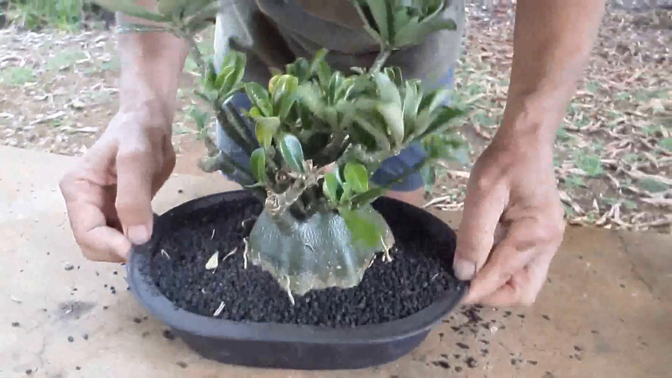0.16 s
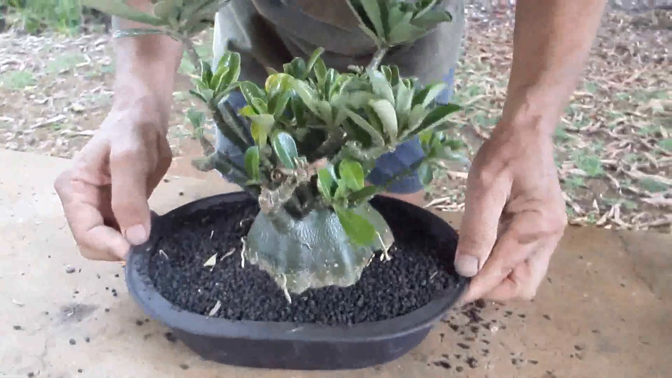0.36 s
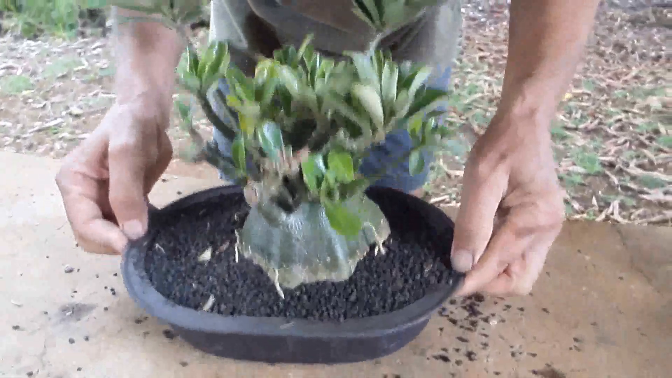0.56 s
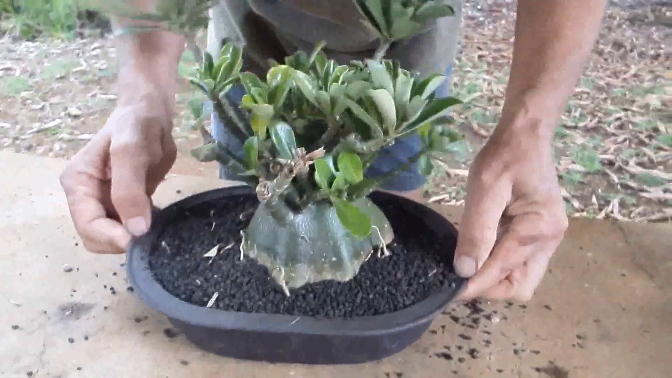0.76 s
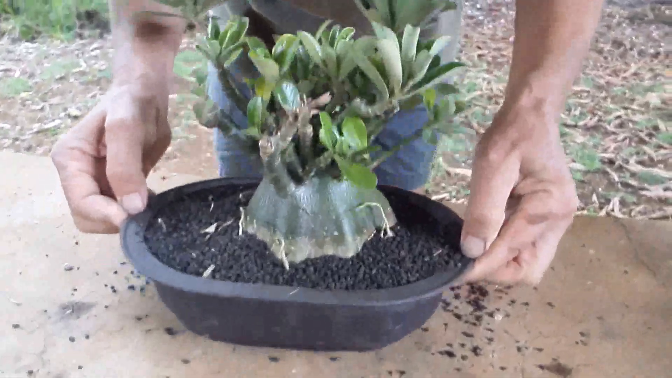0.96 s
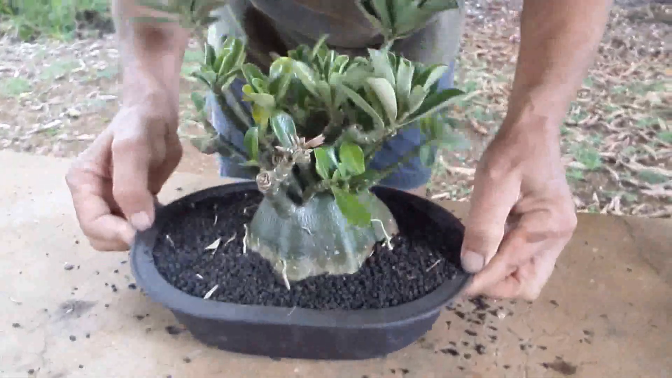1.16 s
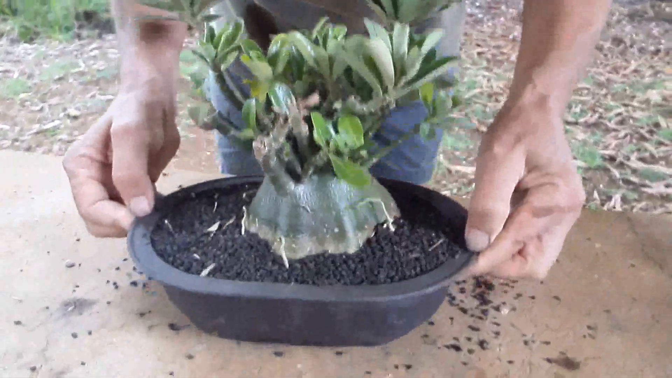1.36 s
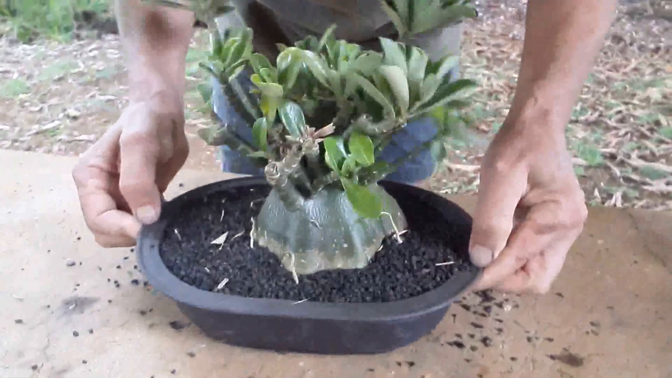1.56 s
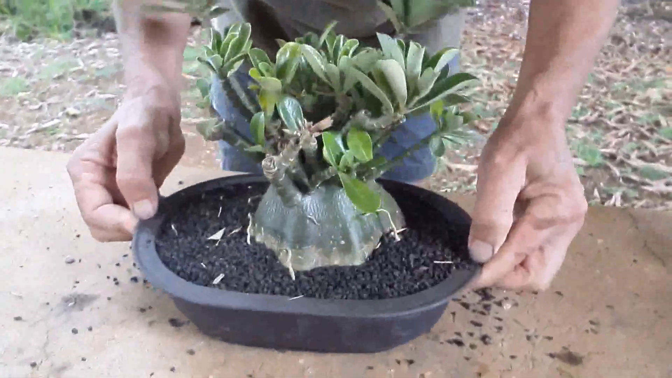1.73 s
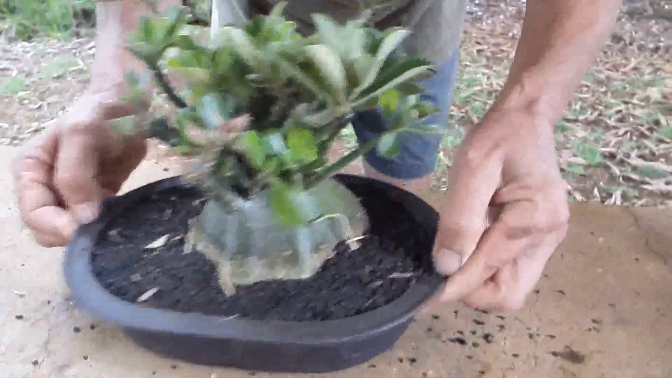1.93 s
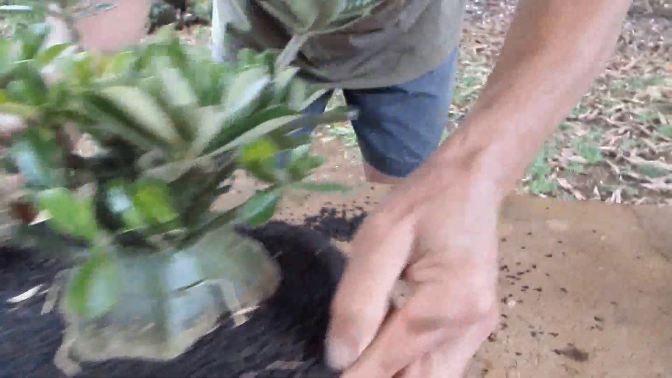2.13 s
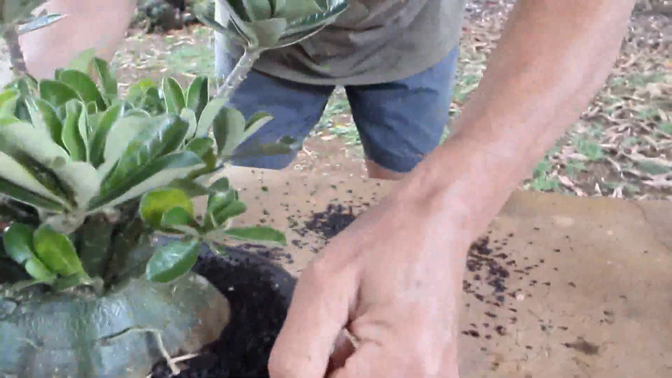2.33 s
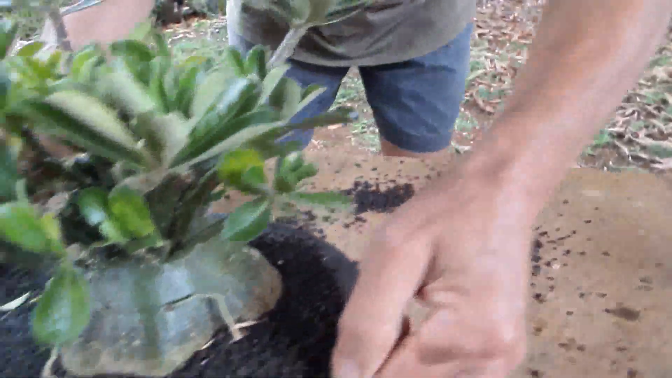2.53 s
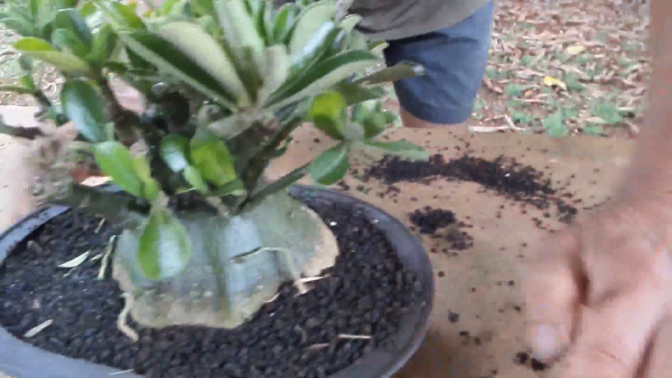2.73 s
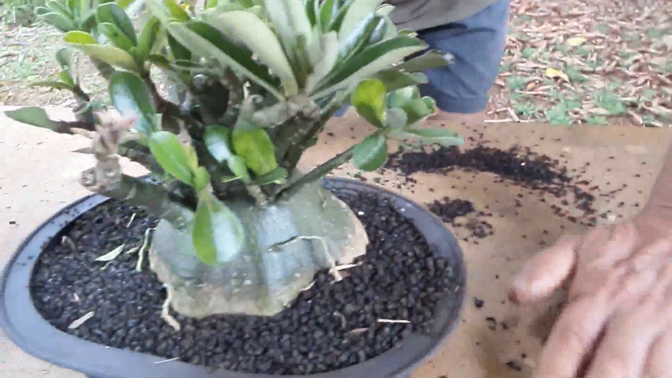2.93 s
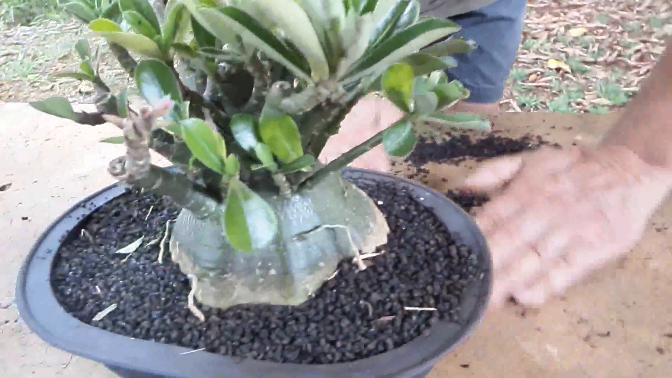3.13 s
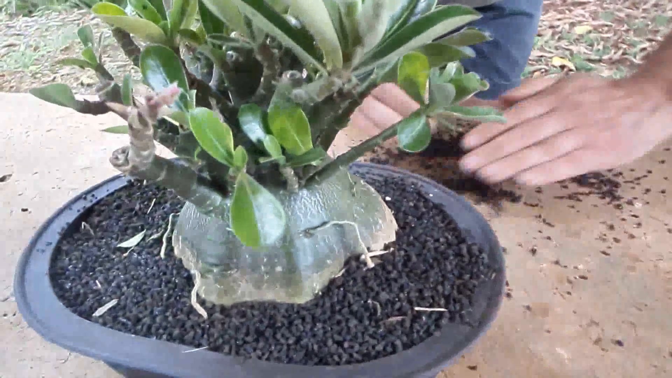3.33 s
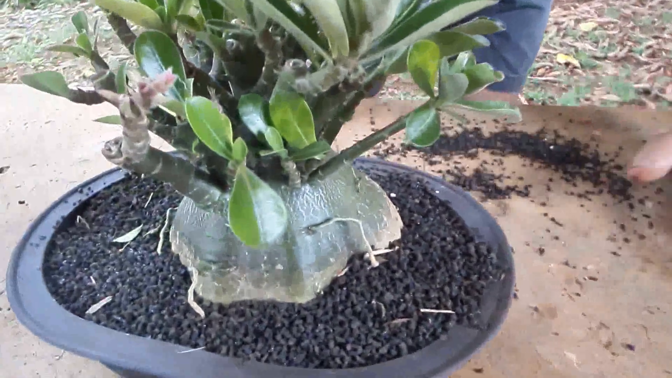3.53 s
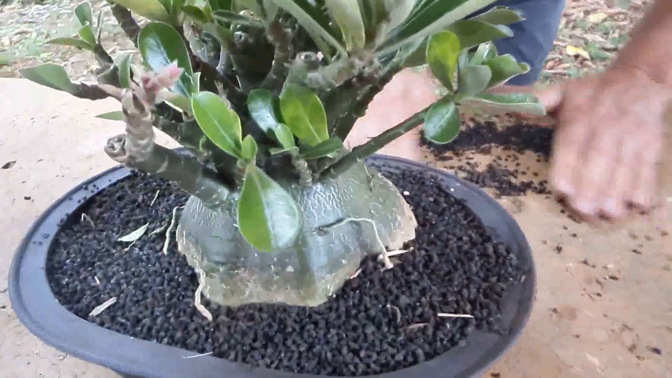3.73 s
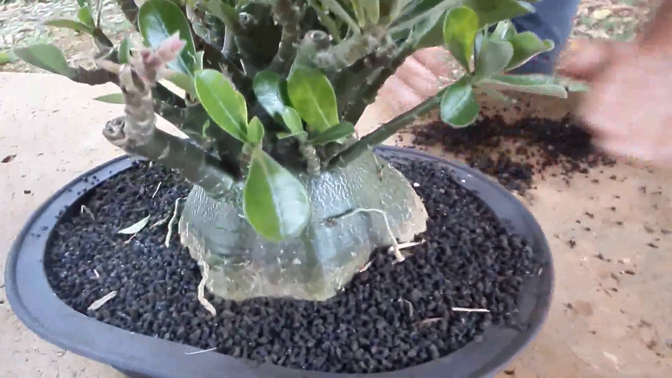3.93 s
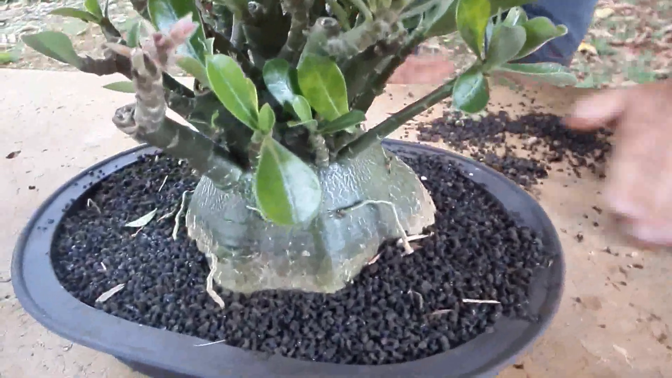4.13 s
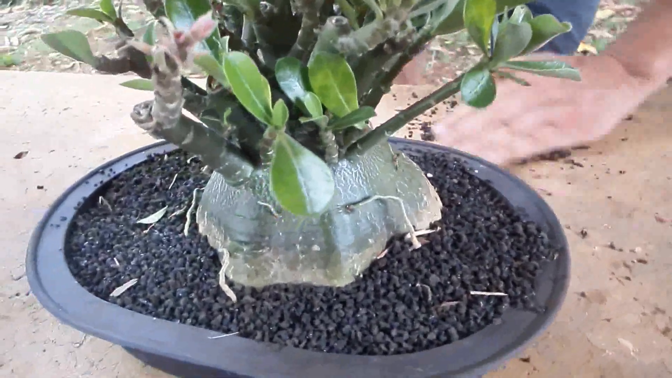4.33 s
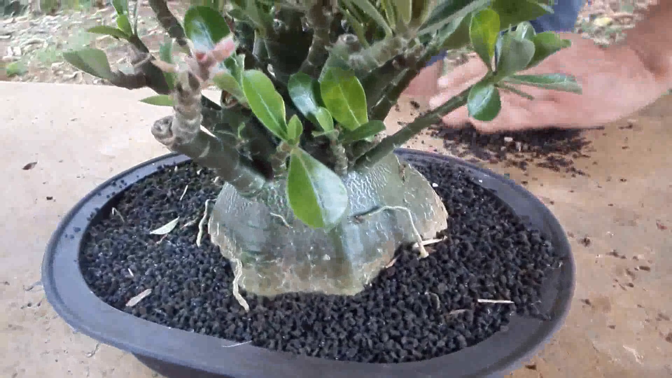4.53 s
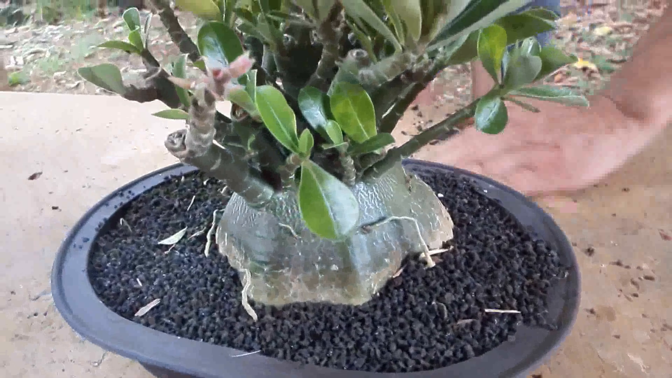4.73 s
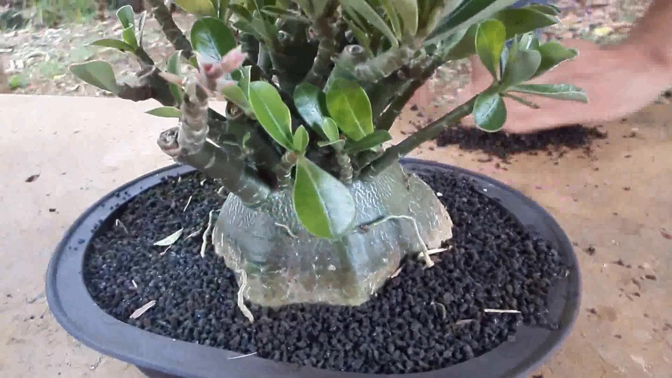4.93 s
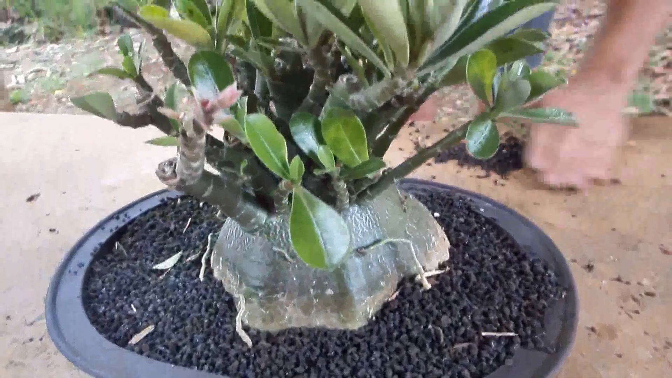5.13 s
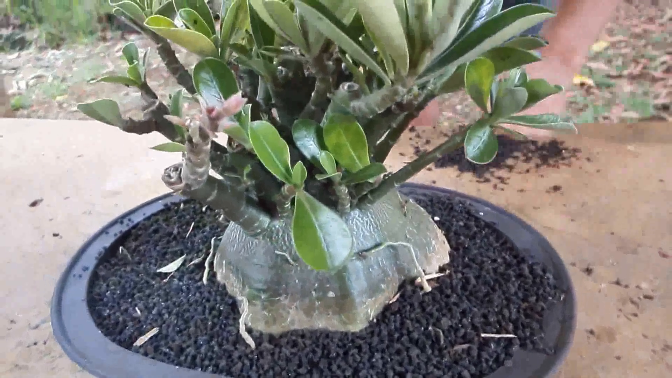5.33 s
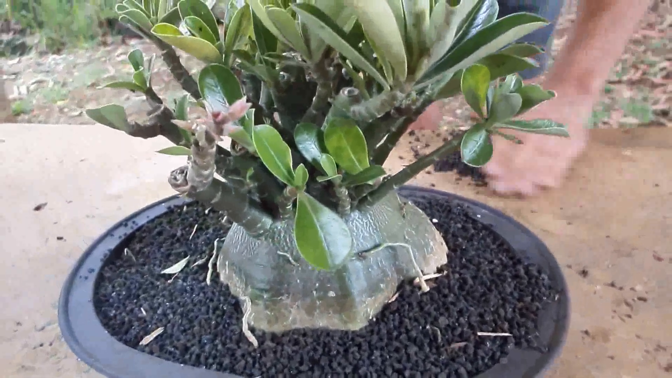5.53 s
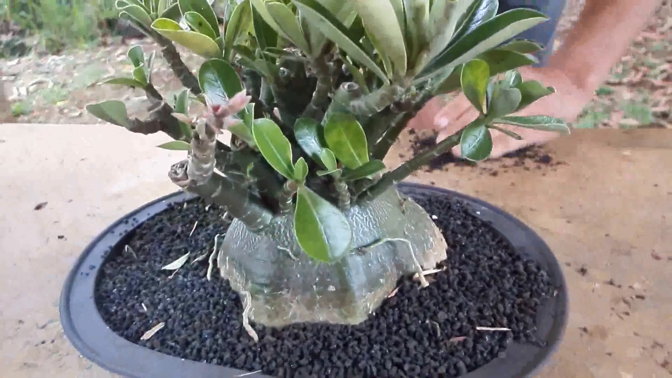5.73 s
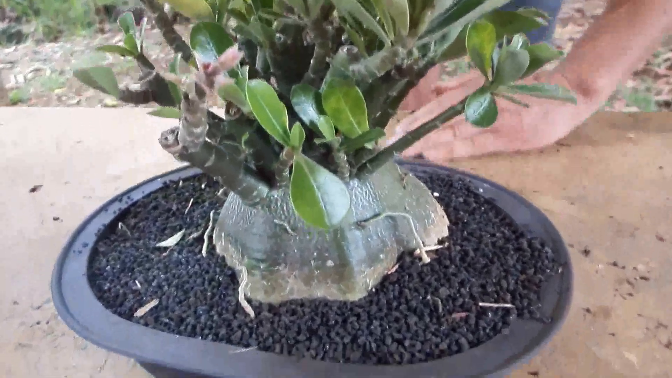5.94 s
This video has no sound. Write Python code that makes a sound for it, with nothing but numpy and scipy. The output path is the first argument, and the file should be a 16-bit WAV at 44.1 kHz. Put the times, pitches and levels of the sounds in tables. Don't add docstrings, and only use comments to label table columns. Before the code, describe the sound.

Outdoors, a pot raps a tabletop four times with rattling gravel; small birds chirp, grit is brushed in scratchy strokes, and a distant rooster crows.

```python
import sys
import numpy as np
from scipy import signal
from scipy.fft import rfft, irfft, next_fast_len
from scipy.io import wavfile
from scipy.ndimage import uniform_filter1d

SR = 44100
rng = np.random.default_rng(int(sys.argv[2]) if len(sys.argv) > 2 else 0)


def unload_audio(sound):
    columns = np.transpose(np.atleast_2d(sound))
    steps = np.round(np.clip(columns, -1, 1) * 32767)
    wavfile.write(sys.argv[1], SR, steps.astype(np.int16))


def makeup_ratio(level_db):
    decades = np.asarray(level_db, float) / 20
    return 10 ** decades


N = 268569

# frequency in Hz, level in dB per Hz.
AIR_SPECTRUM = [(20, -35), (40, -22), (100, -6), (130, -9.5), (200, -12.5), (480, -17.5), (600, -14.5),
                (1760, -18.5), (2100, -27.5), (2900, -27), (3500, -23), (13000, -17.5), (16000, -20)]
# frequency in Hz, level in dB per Hz.
RUMBLE_SPECTRUM = [(70, -33), (150, -8), (250, -3.5), (350, -12.5), (700, -25.5)]
# time in seconds, rumble level in dB.
TRAFFIC_LEVEL = [(0, -67), (2.0, -77.5), (2.6, -63), (3.3, -60.5), (4.6, -56), (5.5, -57.5), (6.09, -59)]
# frequency in Hz, likeness from 0 to 1.
AIR_LIKENESS = [(30, .5), (60, 0.8), (240, 0.83), (950, 0.44), (3770, 0.054), (15000, 0.14)]
# frequency in Hz, likeness from 0 to 1.
NEAR_LIKENESS = [(60, 0.82), (240, 0.38), (950, 0.68), (3770, 0.71), (15000, 0.29)]
# time in seconds, firing rate in Hz, level in dB.
ENGINE_CURVE = [(2.8, 109.6, -66.5), (3.7, 122.8, -63), (4.9, 148.9, -63.5), (6.09, 140.8, -67.5)]
# time in seconds, hum level in dB.
HUM_LEVEL = [(0, -70), (2.3, -69.5), (3.2, -62.5), (4.6, -61), (4.9, -74), (6.09, -70)]
# start in seconds, length in seconds, from Hz, to Hz, level in dB.
GLIDING_RINGS = [
    (.066, .024, 1560, 1540, -52),
    (.03, 0.034, 1500, 1400, -59),
    (3.145, 0.054, 3000, 4000, -52),
    (3.215, .065, 3700, 3100, -52),
    (4.9, .22, 3400, 3800, -54),
    (5.33, .08, 3500, 4000, -50),
    (3.078, .025, 1500, 1500, -43),
    (3.115, 0.077, 1600, 1500, -51),
    (3.43, 0.024, 900, 950, -45.5),
]
# time in seconds, level in dB.
LONE_TICKS = [
    (.0455, -41),
    (.073, -35.5),
    (2.805, -34),
    (3.082, -47),
    (4.708, -40),
    (4.755, -46),
    (4.788, -40),
]
# time in seconds, level in dB.
SWEEP_SNAPS = [(3.0639, -35), (3.1165, -28), (3.146, -27), (3.2695, -32), (3.3314, -32), (3.4084, -23),
               (3.4476, -25), (3.7223, -33), (3.7843, -31), (3.8624, -28), (4.2722, -34), (4.2844, -29),
               (4.4124, -33), (4.4574, -30), (4.575, -25), (4.6044, -32), (4.7795, -33), (4.9154, -38),
               (4.924, -35), (5.2225, -38), (5.2497, -32), (5.2674, -36), (5.2804, -33), (5.2977, -29),
               (5.3438, -29), (5.4014, -28), (5.7195, -33), (5.7534, -31)]
# time in seconds, blow level in dB, gravel rattle in dB.
CONTACTS = [(0.047, -49.5, -50), (0.077, -50, -44.5), (0.313, -12.5, -15.5), (0.317, -11.5, -19.5),
            (0.3234, -7, -27), (0.328, -14.5, -43.5), (0.352, -28.5, -35.5), (0.504, -49.5, -47.5),
            (0.792, -4.5, -20), (0.7965, -15, -24), (0.8054, -5.5, -26.5), (0.851, -30.5, -37),
            (0.859, -31, -33.5), (0.998, -50.5, -47.5), (1.095, -59.5, -64), (1.19, -45, -46.5),
            (1.257, -3, -15), (1.26, -17, -15), (1.297, -28, -30.5), (1.682, -15, -19), (1.688, -3, -28),
            (1.713, -16, -30.5), (1.716, -31, -39.5), (1.761, -37.5, -41), (1.825, -53, -57),
            (2.559, -36, -43.5), (2.573, -40, -40), (2.59, -44, -47), (4.276, -53, -52)]
# time in seconds, level in dB.
RIM_GRAZES = [
    (.303, -35),
    (.308, -26.5),
    (.782, -27),
    (.786, -29),
    (1.246, -30),
    (1.251, -19),
    (1.674, -37.5),
    (1.678, -20.5),
]
# mode in Hz, level in dB, t60 in seconds.
POT_MODES = [(505, -14, 0.08), (548, -8.5, 0.06), (628, -3, 0.025), (759, 4.5, 0.025), (824, 3.5, 0.026),
             (1102, 0, 0.035), (1256, -6, 0.02), (1697, -12, 0.024), (2940, -2.5, 0.0073),
             (3590, -5.5, 0.015), (193, -10, 0.082), (292, -13, .07)]
# frequency in Hz, level in dB per Hz.
GRAVEL_SPECTRUM = [(1180, -18), (2000, -5), (2490, -10.5), (2780, -3), (3400, -1), (6310, -7.5),
                   (8330, -4.5), (16000, -16)]
# frequency in Hz, level in dB per Hz.
BOARD_SPECTRUM = [(400, -20), (530, -3), (790, 3), (890, 1), (990, -12.5), (1100, -2.5), (1900, -20),
                  (3000, -30)]
# frequency in Hz, left minus right in dB.
POT_LEAN = [(200, 2), (800, 2), (2400, 0.5), (5000, 1.4), (12000, 4)]
# frequency in Hz, t60 in seconds.
YARD_DECAY = [(200, 0.24), (800, 0.29), (3000, 0.36), (10000, 0.36)]
# frequency in Hz, t60 in seconds.
TREE_DECAY = [(1000, 0.6)]
# time in seconds, pitch in Hz, effort in dB.
FAR_CROW_CURVE = [(.09, 845, -82), (.12, 850, -77), (.22, 862, -75), (.29, 848, -78), (.45, 850, -79),
                  (.8, 838, -81.5)]
# start in seconds, length in seconds, pitch in Hz, effort in dB, brightness in dB.
HEN_NOTES = [
    (3.595, .15, 816, -49, -8),
    (3.62, .135, 920, -56, 3),
    (3.685, .09, 703, -60.5, 9),
    (3.875, 0.09, 702, -58, 4),
    (4.014, .045, 905, -43.5, -10),
    (5.485, 0.039, 988, -62.5, 14),
    (5.535, .05, 970, -51, -9),
    (3.6, 0.048, 736, -65.5, 7),
]
# start in seconds, length in seconds, top pitch in Hz, effort in dB, brightness in dB.
HOARSE_CALLS = [
    (3.79, 0.1, 750, -60, 6),
    (3.82, .07, 985, -55.5, -6),
    (3.929, .14, 1060, -50, -4),
    (3.9, .14, 800, -55.5, -6),
    (4.06, .14, 780, -63.5, 2),
    (4.148, .23, 1030, -48, -6),
    (4.76, .06, 710, -65.5, 9),
    (5.54, .07, 810, -59.5, 0),
    (1, 0.15, 650, -81, 15.5),
]
# start in seconds, length in seconds, effort in dB, brightness in dB.
CROW_SURGES = [(4.055, .2, -47.5, -3), (4.245, .155, -48, -3), (4.395, .11, -49, -1.5),
               (4.499, .18, -57, -6), (4.72, 0.18, -53.5, 0), (4.905, .06, -52, 9),
               (4.965, 0.059, -53.5, 4), (5.035, 0.059, -54.5, 6), (5.096, 0.049, -55.5, 13.5),
               (5.14, .085, -49, 1), (5.219, 0.062, -51, -12), (5.265, 0.06, -49.5, 2),
               (5.325, 0.056, -55.5, 14), (5.375, 0.09, -55, 7), (5.471, 0.032, -63, 14),
               (5.516, .12, -68, 13.5)]
# time in seconds, pitch in Hz.
CROW_GLIDE = [(4.05, 940), (4.15, 952), (4.27, 961.3), (4.449, 941), (4.72, 931), (5.1, 902.4),
              (5.461, 892.7), (5.64, 893)]
# start in seconds, length in
# seconds, from Hz, to Hz, level in dB.
BIRD_CHIRPS = [(0.098, 0.12, 6370, 6430, -67), (0.502, .16, 4150, 3840, -69),
               (1.55, .09, 4500, 3860, -67.5), (2.457, .035, 3780, 3920, -64),
               (2.479, 0.038, 3920, 4670, -51.5), (2.531, 0.053, 4600, 4540, -58),
               (2.655, .02, 4400, 5900, -56), (2.638, 0.057, 4430, 4340, -59),
               (2.694, .055, 4250, 4950, -51.5), (2.74, 0.04, 4900, 5200, -56),
               (2.72, .07, 4250, 4250, -60), (2.485, .035, 3950, 3950, -58), (2.915, .07, 4850, 4500, -64),
               (2.854, 0.049, 4900, 3260, -51.5), (2.893, .04, 3210, 4210, -56.5),
               (2.919, 0.076, 4210, 4280, -61), (3.573, 0.083, 3260, 3800, -56),
               (3.69, 0.097, 2950, 3245, -54), (4.833, 0.098, 2715, 3450, -50),
               (4.92, .13, 3435, 3990, -52)]
# time in seconds, level in dB.
LEG_JOLTS = [
    (0.314, -48),
    (0.793, -28.5),
    (1.256, -37.5),
    (1.688, -50),
    (2.561, -49.5),
]
# full speed from seconds, to seconds, grit level in dB, palm pressure in dB,
# speed-up and slow-down in dB per second.
HAND_PUSHES = [(2.79, 2.795, -42.5, 7, 450), (3.088, 3.09, -51, 10, 502), (3.128, 3.205, -40.5, 2, 250),
               (3.215, 3.26, -46.5, 2.5, 250), (3.275, 3.3, -43, 2, 200), (3.33, 3.45, -40, -2.5, 300),
               (3.45, 3.48, -43.5, -3, 500), (3.57, 3.692, -65.5, 15, 200),
               (3.726, 3.725, -43.5, -20, 1200), (3.787, 3.86, -45.5, 3, 400),
               (3.851, 4.03, -41, -0.5, 380), (4.285, 4.33, -42, -10, 600), (4.356, 4.467, -47, 1, 200),
               (4.505, 4.604, -41.5, 1.5, 200), (4.64, 4.62, -48.5, 2, 700), (4.668, 4.875, -59, 12, 300),
               (4.788, 4.79, -46.5, -7.5, 496.5), (4.928, 5, -46.5, 7.5, 350), (4.987, 5.1, -43, 3.5, 188),
               (5.293, 5.31, -43, 0.5, 225), (5.347, 5.42, -40.5, 0, 247), (5.755, 5.805, -41, -0.5, 202)]
# frequency in Hz, level in dB per Hz.
GRIT_SPECTRUM = [(3500, -7.5), (5200, 2), (7000, 2.5), (10400, 5.5), (13000, 4.5), (15800, -2),
                 (17000, -33)]
# frequency in Hz, level in dB per Hz.
COARSE_SPECTRUM = [(1800, -11), (2700, -5.5), (3500, 2.5), (4800, -2.5), (7000, -15.5)]
# frequency in Hz, level in dB per Hz.
SCRAPE_SPECTRUM = [(250, -82), (500, -3.5), (700, -6), (900, -1), (1100, -2), (1450, 0), (1900, -6.5),
                   (2600, -10.5), (4000, -20)]


def evened(x):
    return x / np.sqrt(np.mean(x ** 2) + 1e-20)


def read(points, hz):
    f, value = np.transpose(points)
    return np.interp(np.log(hz + 1), np.log(f + 1), value)


def along(rows):
    s, *columns = np.transpose(rows)
    t = np.arange(round(s[0] * SR), min(round(s[-1] * SR), N))
    fade = signal.windows.tukey(len(t), min(1, 900 / len(t)))
    return t, fade, [np.interp(t / SR, s, c) for c in columns]


def colour(x, spectrum):
    size = next_fast_len(x.shape[-1])
    gain = makeup_ratio(read(spectrum, np.fft.rfftfreq(size, 1 / SR)))
    return irfft(rfft(x, size) * gain, size)[..., :x.shape[-1]]


def pair(x, other, likeness):
    size = next_fast_len(N)
    c = np.clip(read(likeness, np.fft.rfftfreq(size, 1 / SR)), 0, 1)
    mid = rfft(x, size) * np.sqrt((1 + c) / 2)
    side = rfft(other, size) * np.sqrt((1 - c) / 2)
    return irfft(np.array([mid + side, mid - side]), size)[:, :N]


def wobble(size, hz):
    r = np.exp(-2 * np.pi * hz / SR)
    z = rng.standard_normal((2, size + 4000))
    for _ in range(2):
        z = signal.lfilter([1], [1, -r], z)
    z = evened(z[:, 4000:])
    return z[0] + 1j * z[1]


def partial(hz, db, rough, rough_hz):
    rough = np.clip(rough, 0, 1)
    smear = np.sqrt(1 - rough) + np.sqrt(rough / 2) * wobble(len(hz), rough_hz)
    return np.sqrt(2) * makeup_ratio(db) * (smear * np.exp(2j * np.pi * np.cumsum(hz) / SR)).real


def soft_ends(t, length):
    edge_s = min(0.02, length / 2)
    return np.sin(np.pi / 2 * np.clip(np.minimum(t, length - t) / edge_s, 0, 1))


def glides(rows, rough, rough_hz):
    out = np.zeros(N)
    for start, length, from_hz, to_hz, db in rows:
        t = np.arange(0, length, 1 / SR)
        hz = from_hz + (to_hz - from_hz) * t / length
        out[round(start * SR):][:len(t)] += soft_ends(t, length) * partial(hz, db, rough, rough_hz)
    return out


def yard(x, decays):
    taps = np.zeros((2, SR // 2))
    at = np.arange(round(0.008 * SR), SR // 2 - 20, 20)
    at = at + rng.integers(0, 20, (2, len(at)))
    np.put_along_axis(taps, at, rng.choice([-1., 1.], at.shape), 1)
    hz, t, z = signal.stft(taps, SR, nperseg=256)
    tail = signal.istft(z * makeup_ratio(-60 * t / read(decays, hz)[:, None]), SR, nperseg=256)[1]
    tail = tail / np.linalg.norm(tail[0])
    return pair(*signal.fftconvolve(x[None], tail, axes=1)[:, :N], NEAR_LIKENESS)


def air():
    wash = makeup_ratio(-55) * evened(colour(rng.standard_normal((2, N)), AIR_SPECTRUM))
    rumble = evened(colour(rng.standard_normal((2, N)), RUMBLE_SPECTRUM))
    s, db = np.transpose(TRAFFIC_LEVEL)
    swell_db = 1.0 + 2.2 * wobble(N, 4.4).real
    rumble *= makeup_ratio(np.interp(np.arange(N) / SR, s, db) + swell_db)
    return pair(*(wash + rumble), AIR_LIKENESS)


def engine():
    hum_hz = 104.5
    out = np.zeros(N)
    t, _, (db,) = along(HUM_LEVEL)
    out[t] += partial(np.full(len(t), hum_hz), db, 0.19, 6.9)
    t, fade, (hz, db) = along(ENGINE_CURVE)
    orders = partial(hz, db, 0.99, 8.0) + partial(2 * hz, db - 5.0, 1.0, 8.5)
    out[t] += fade * orders
    return out


def gliding_rings():
    return glides(GLIDING_RINGS, 1, 260)


def ticks():
    t60_s = 0.014
    out, t = np.zeros((2, N)), np.arange(600) / SR
    for s, db in LONE_TICKS + [(s, db - 9.0) for s, db in SWEEP_SNAPS]:
        click = makeup_ratio(db - 60 * t / t60_s) * rng.standard_normal((2, len(t)))
        out[:, round(s * SR):][:, :len(t)] += click
    return pair(*colour(out, GRIT_SPECTRUM), NEAR_LIKENESS)


def contacts():
    rattle_t60_s, shake_t60_s = 0.054, 0.034
    body, rattle, shake = np.zeros((3, N))
    t = np.arange(6000) / SR
    hz, db, t60_s = np.transpose(POT_MODES)[:, :, None]
    thin = signal.butter(3, 400, "high", fs=SR, output="sos")
    for s, blow_db, *gravel_db in CONTACTS + RIM_GRAZES:
        detune = 1 + 0.01 * rng.standard_normal((len(POT_MODES), 1))
        ring = (makeup_ratio(db - 60 * t / t60_s) * np.sin(2 * np.pi * hz * detune * t)).sum(0)
        ring = signal.sosfilt(thin, ring * np.minimum(t / 0.0011, 1))
        at = slice(round(s * SR), round(s * SR) + len(t))
        body[at] -= makeup_ratio(blow_db - 0.5) * ring / abs(ring).max()
        shake[at] += makeup_ratio(blow_db - 60 * t / shake_t60_s)
        if gravel_db:
            rattle[at] += makeup_ratio(gravel_db[0] - 1 - 60 * t / rattle_t60_s) * np.minimum(t / 0.00029, 1)
    return body, rattle, shake


def knocks():
    body, rattle, shake = contacts()
    grains = rng.standard_normal((2, N)) * makeup_ratio(1.26 * wobble(N, 700).real)
    stones = colour(grains * rattle, GRAVEL_SPECTRUM) / colour(grains, GRAVEL_SPECTRUM).std()
    stones = pair(*stones, NEAR_LIKENESS)
    noise = rng.standard_normal(N)
    boards = colour(noise * shake, BOARD_SPECTRUM) / colour(noise, BOARD_SPECTRUM).std()
    leaning = [colour(body, [(hz, side * db / 2) for hz, db in POT_LEAN]) for side in (1, -1)]
    near = np.array(leaning) + stones + makeup_ratio(-12.0) * boards
    sent = makeup_ratio(-17.0) * body + makeup_ratio(-16.5) * boards + makeup_ratio(-11) * stones.mean(0)
    return near + yard(sent, YARD_DECAY)


def voice(start, hz, effort_db, bright_db, fourth_db, rough, rough_hz):
    t, sound = np.arange(len(hz)) / SR, 0
    for k, db in zip((1, 2, 4), (0, bright_db, bright_db + fourth_db)):
        flutter_db = 1.5 * wobble(len(hz), 12).real
        level_db = effort_db + db + flutter_db
        sound = sound + partial(k * hz, level_db, rough * k ** 0.5, rough_hz * k ** 0.5)
    return np.pad(sound * soft_ends(t, t[-1]), (round(start * SR), N))[:N]


def fowl():
    fourth_db = -15
    arch_share = 0.04
    clear, hoarse = np.zeros((2, N))
    t, _, (hz, db) = along(FAR_CROW_CURVE)
    clear += voice(t[0] / SR, hz, db, 16, fourth_db, 0.38, 28)
    for start, length, top_hz, db, bright_db in HOARSE_CALLS:
        arch = np.sin(np.pi * (np.arange(0, length, 1 / SR) / length) ** 0.7)
        hz = top_hz * (1 - arch_share + arch_share * arch)
        hoarse += voice(start, hz, db, bright_db, fourth_db, 0.55, 60)
    for start, length, hz, db, bright_db in HEN_NOTES:
        clear += voice(start, np.full(round(length * SR), hz), db, bright_db, fourth_db, 0.3, 40)
    for start, length, db, bright_db in CROW_SURGES:
        hz = np.interp(start + np.arange(0, length, 1 / SR), *np.transpose(CROW_GLIDE))
        tired_db = -5 - 7 * (start - 4.05)
        clear += voice(start, hz, db, bright_db, tired_db, 0.06, 30)
    return clear + hoarse + yard(makeup_ratio(-5) * clear + hoarse, YARD_DECAY)


def small_birds():
    chirps = glides(BIRD_CHIRPS, 0.5, 115)
    return makeup_ratio(-1.5) * chirps + makeup_ratio(-2.5) * yard(chirps, TREE_DECAY)


def thumps():
    out, t = np.zeros(N), np.arange(5000) / SR
    jolt = 0.3 * np.sin(2 * np.pi * 85 * t)
    jolt += 0.54 * np.sin(2 * np.pi * 130 * t)
    jolt += 1.2 * np.sin(2 * np.pi * 270 * t)
    jolt *= makeup_ratio(-60 * t / 0.092) * np.minimum(t / 0.0014, 1)
    for s, db in LEG_JOLTS:
        out[round(s * SR):][:len(t)] += makeup_ratio(db) * jolt
    return out


def hand():
    table_db, coarse_db = -9.5, -9.5
    roll_db, roll_db_per_s = -19, 63
    t, power = np.arange(N) / SR, np.zeros((3, N))
    for start, end, db, press_db, slope_db_per_s in HAND_PUSHES:
        outside_s = np.maximum(np.maximum(start - t, t - end), 0)
        push = makeup_ratio(db - slope_db_per_s * outside_s)
        roll = makeup_ratio(db + roll_db - roll_db_per_s * abs(t - end)) * (t > end)
        share = makeup_ratio([[0], [table_db + press_db], [coarse_db + press_db]])
        power += (push ** 2 + roll ** 2) * share ** 2
    return np.sqrt(power)


def patchy(x, patchy_db, size=(9, 5)):
    z = signal.stft(x, nperseg=256)[2]
    patches = rng.standard_normal(z.shape[-2:])
    for axis in (0, 1):
        patches = uniform_filter1d(patches, size[axis], axis)
    y = signal.istft(z * makeup_ratio(patchy_db * evened(patches)), nperseg=256)[1]
    return evened(y[..., :x.shape[-1]])


def sweep():
    grit, table, coarse = hand()
    burst_db = 1.4 * np.minimum(rng.exponential(1, (5, N)), 4)
    clicks = rng.standard_normal((5, N)) * makeup_ratio(burst_db)
    clicks *= makeup_ratio(0.8 * wobble(N, 25).real + 1.1 * wobble(N, 150).real)
    out = patchy(colour(clicks[:2], GRIT_SPECTRUM), 1.4) * grit * makeup_ratio(2.0)
    out += patchy(colour(clicks[2:4], COARSE_SPECTRUM), 2.9, size=(3, 8)) * coarse
    scrape = patchy(colour(clicks[4], SCRAPE_SPECTRUM), 3.4, size=(2, 10))
    out[0] += scrape * table * makeup_ratio(3.0)
    lean_db = np.interp(np.arange(N) / SR, [3.2, 4.2], [0.3, -1.6])
    return pair(*out, NEAR_LIKENESS) * makeup_ratio([lean_db / 2, -lean_db / 2])


def scene():
    background = air() + engine()
    near = gliding_rings() + ticks() + knocks() + thumps() + sweep()
    return background + near + fowl() + small_birds()


def top_cut(x):
    return signal.sosfilt(signal.butter(12, 16810, fs=SR, output="sos"), x)


def record(dry):
    b, a = signal.iirnotch(2530, 9, SR)
    notched = 0.04 * dry + 0.96 * signal.lfilter(b, a, dry)
    low_cut = signal.butter(2, 35, "high", fs=SR, output="sos")
    rounded = signal.sosfilt(low_cut, np.tanh(notched))
    top = signal.firwin(255, 16100, window=("kaiser", 8), fs=SR)
    return top_cut(signal.oaconvolve(rounded, top[None], "same"))


dry = scene()
out = record(dry)
unload_audio(out)
```